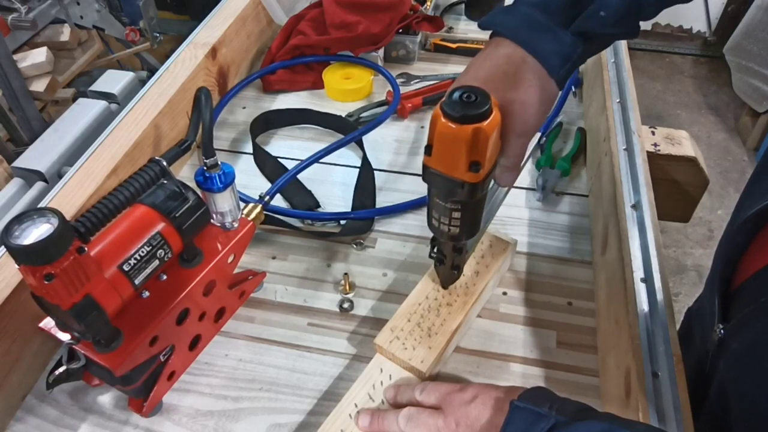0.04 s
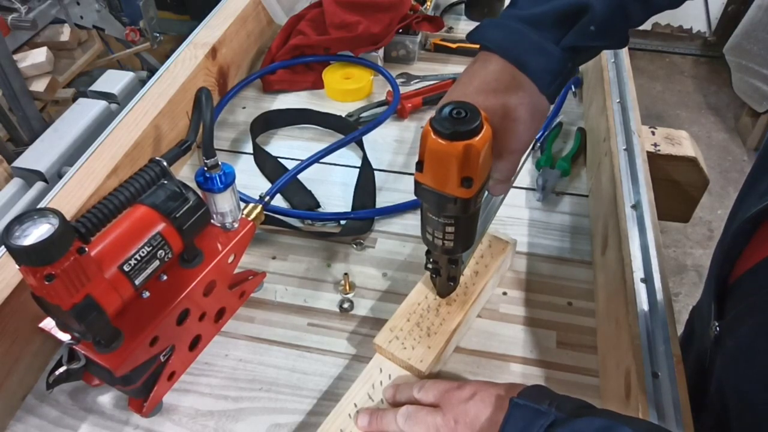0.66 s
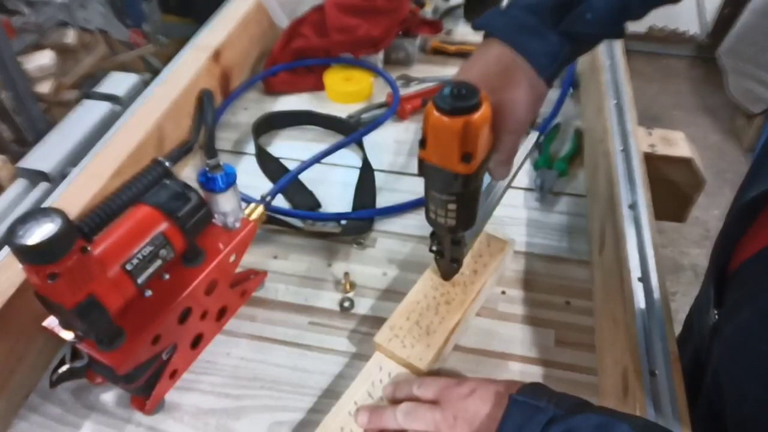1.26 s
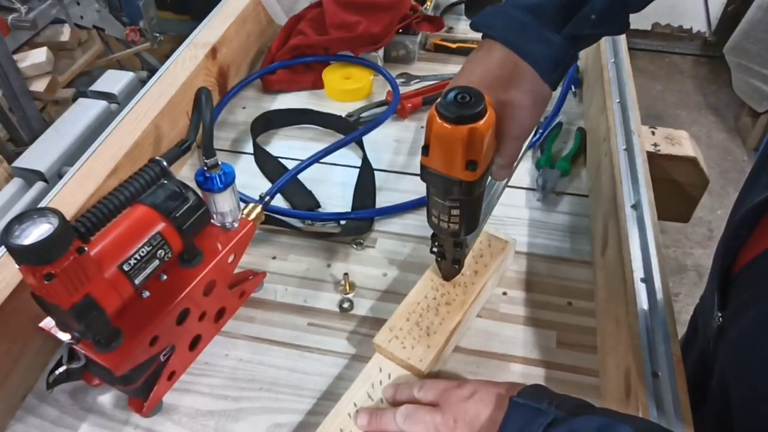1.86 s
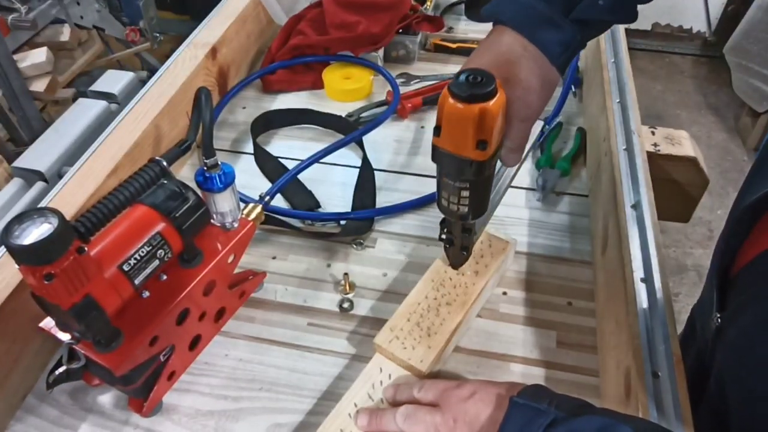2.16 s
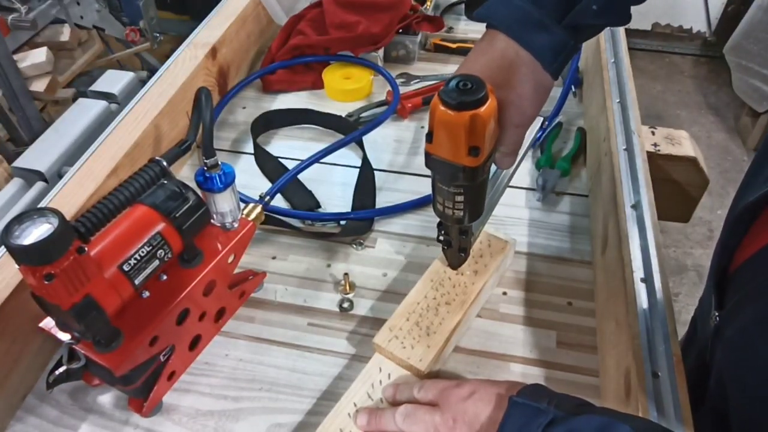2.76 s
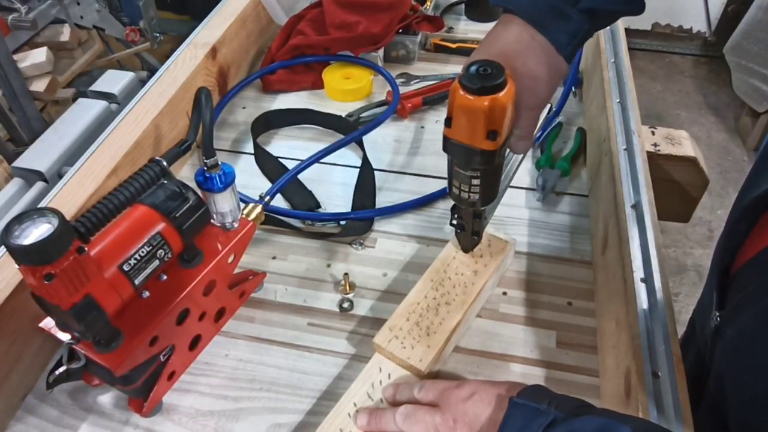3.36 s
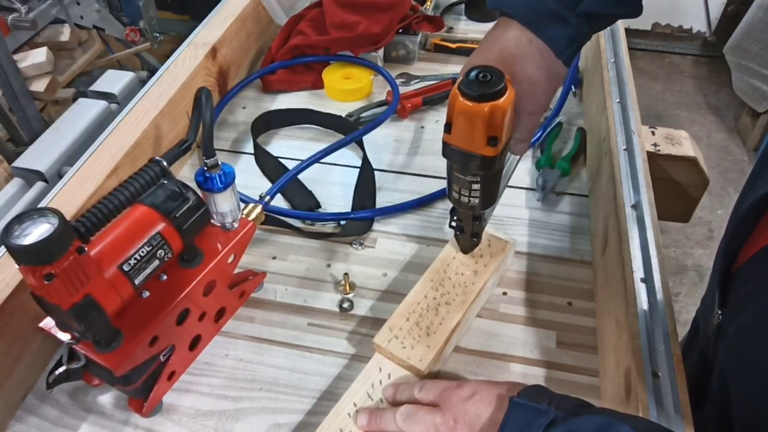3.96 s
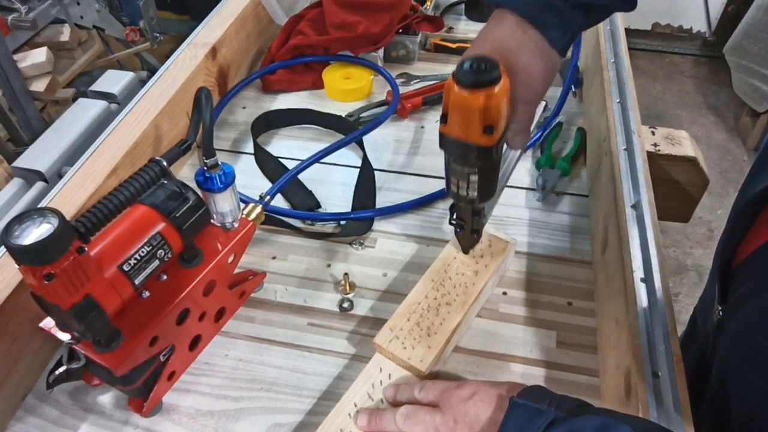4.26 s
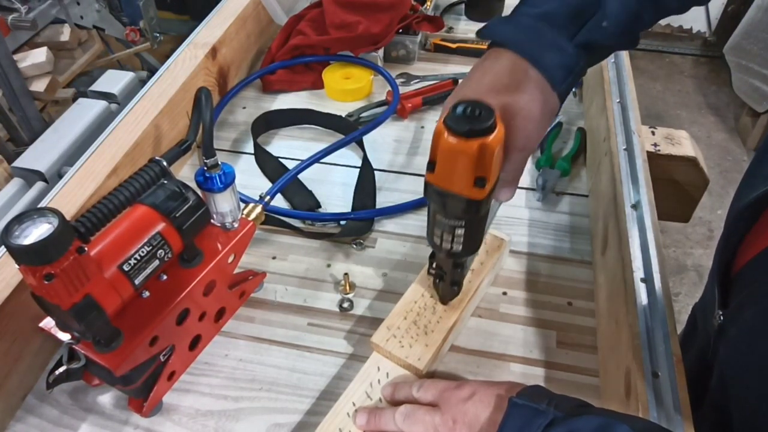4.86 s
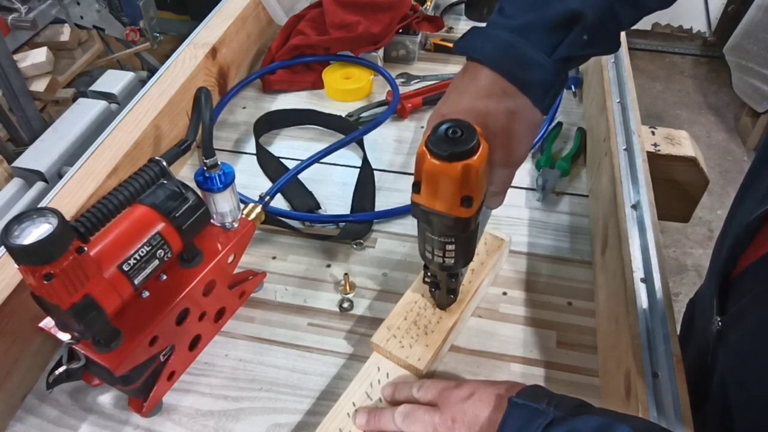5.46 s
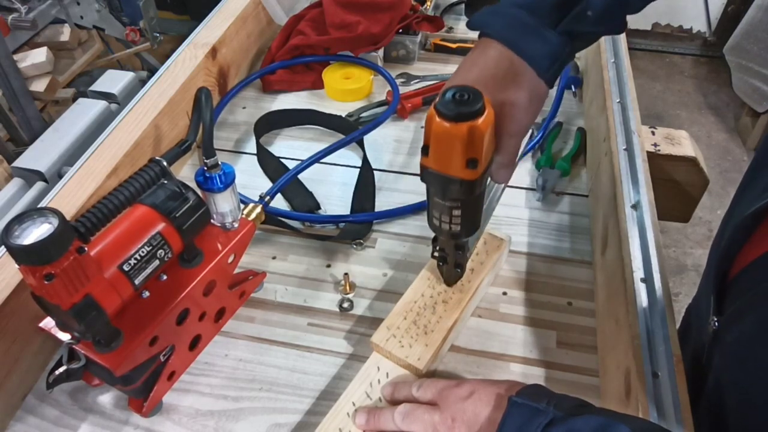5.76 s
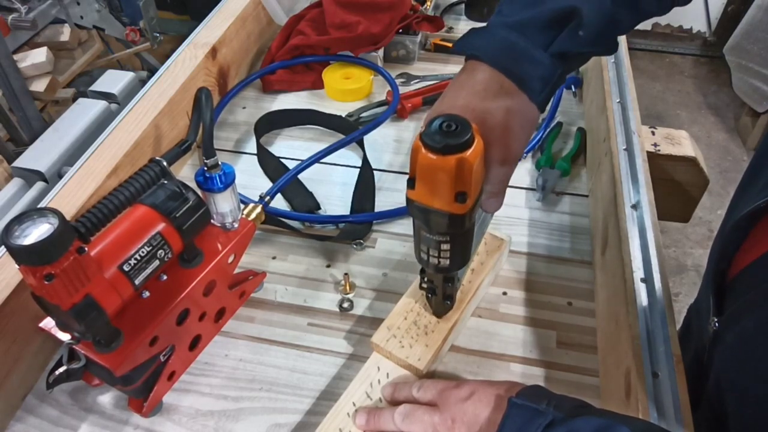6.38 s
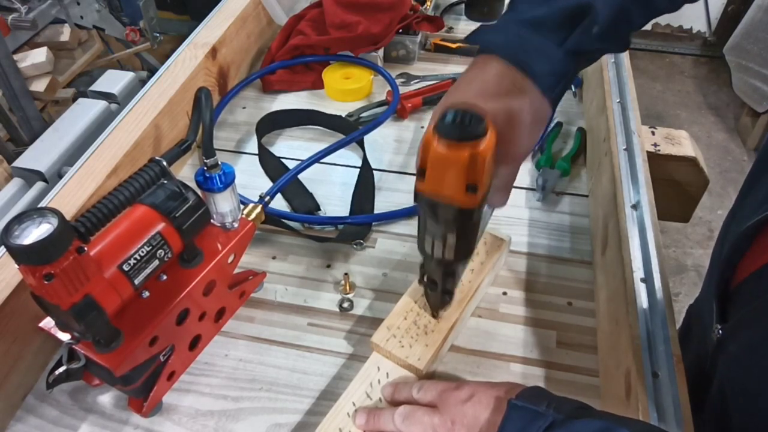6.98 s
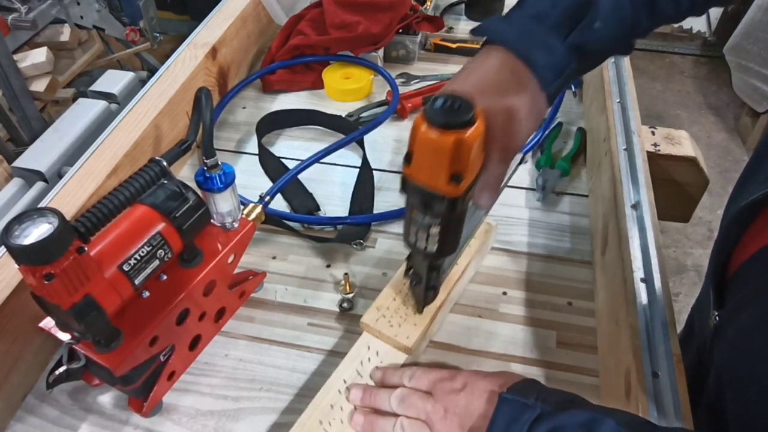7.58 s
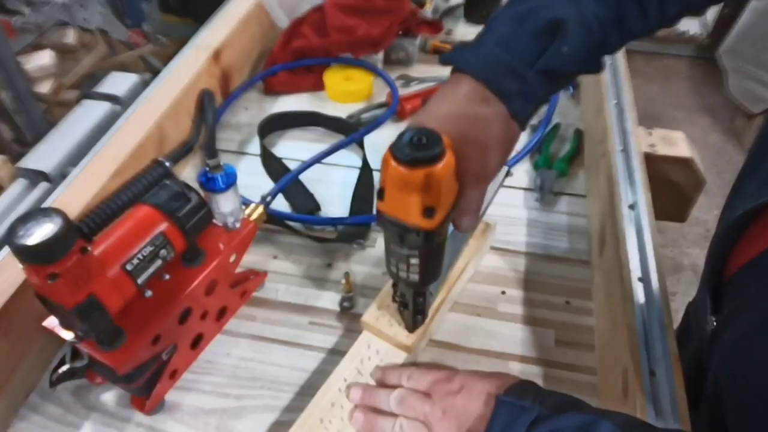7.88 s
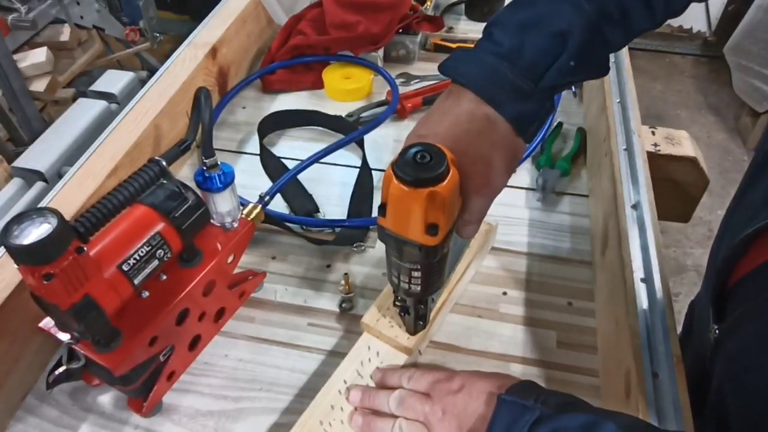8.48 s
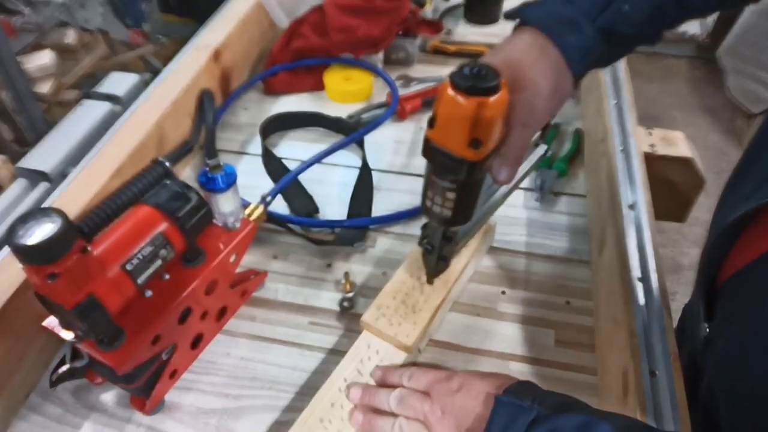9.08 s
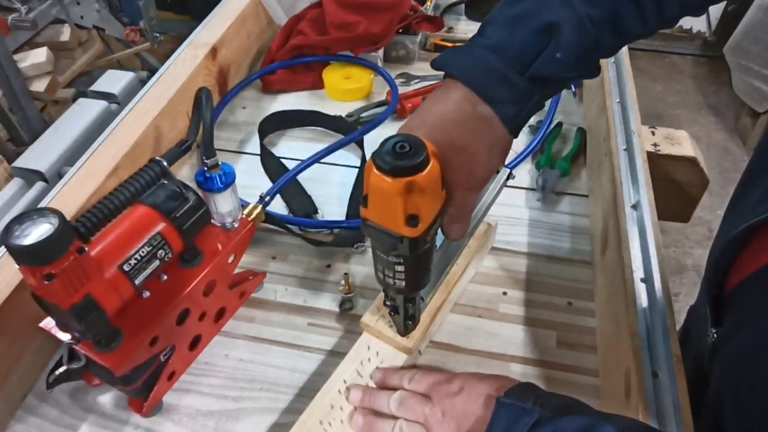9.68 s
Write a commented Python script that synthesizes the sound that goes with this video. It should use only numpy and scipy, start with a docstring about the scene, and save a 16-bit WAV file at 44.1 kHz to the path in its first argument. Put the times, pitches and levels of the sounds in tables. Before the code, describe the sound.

Heard close up in a quiet workshop, a pneumatic nail gun fires into wood seven times, a second or more apart, each shot a hard snap followed by an exhaust puff and a click. A small piston compressor, already running at the start, hums and clatters after each nail, then mostly slows and stops with faint metallic ticks. The volume dips for a moment under each shot.

```python
"""A small air compressor buzzes in a workshop, its piston knocking, then coasts to a ticking stop.
An air nailer then drives seven nails into a strip of wood on a workbench. In each shot air rushes in,
the driver hits the nail, the exhaust puffs and the piston bounces home. Each shot drops the pressure,
so the compressor runs until it is back, and ticks to a stop if no new shot comes first.
All of it is heard in mono through a close microphone that turns itself down under every shot."""
import sys
import numpy as np
from scipy import signal
from scipy.fft import rfft, irfft, next_fast_len
from scipy.io import wavfile
from scipy.ndimage import uniform_filter1d, map_coordinates

SR = 44100
rng = np.random.default_rng(int(sys.argv[2]) if len(sys.argv) > 2 else 0)


def transcribe(signal):
    """Save signal, clipped to [-1, 1], as a 16-bit WAV file at the path in sys.argv[1]."""
    frames = np.atleast_2d(signal).T
    limited = np.clip(frames, -1, 1)
    pcm = np.round(limited * 32767).astype(np.int16)
    wavfile.write(sys.argv[1], SR, pcm)


N = 429093

# The shots: strike_s, fill_s (air flows in this long before the strike),
# home_s (the piston is back this long after it), refill_s (time to restore the pressure)
SHOTS = [(.831, .022, .1465, .92), (1.9285, .0275, .169, .912), (2.8385, .0315, .1425, .976),
         (4.2105, .0265, .146, .949), (5.521, .028, .1505, .953), (6.915, .031, .123, .955),
         (8.515, .029, .125, .955)]
KNOCK_TURNS = 0.35  # how far into each turn of the pump's shaft its piston knocks


def amp(db):
    """Turn decibels into a gain."""
    return 10 ** (np.asarray(db) / 20)


def unit(x):
    """Scale a sound to an average (rms) level of 1."""
    return x / np.sqrt(np.mean(x ** 2) + 1e-20)


def along(points, hz):
    """Read between (pitch_hz, value) points, with octaves evenly spaced."""
    pitches, values = np.transpose(points)
    return np.interp(np.log(hz + 1), np.log(pitches + 1), values)


def filtered(x, response):
    """Give each frequency in x the gain response(hz)."""
    size = x.shape[-1]
    padded = next_fast_len(size + 8192)
    gains = response(np.fft.rfftfreq(padded, 1 / SR))
    return irfft(rfft(x, padded) * gains, padded)[..., :size]


def noise(spectrum, size=N):
    """Noise of average level 1, its tone shaped by (pitch_hz, level_db) points."""
    return unit(filtered(rng.standard_normal(size), lambda hz: amp(along(spectrum, hz))))


def wobble(rate_hz):
    """A smooth curve through rate_hz random values a second."""
    values = rng.standard_normal(int(N * rate_hz / SR) + 4)
    return map_coordinates(values, [np.arange(N) * rate_hz / SR])


def add(track, start_s, sound):
    """Mix a sound into a track at start_s."""
    part = track[max(round(start_s * SR), 0):][:len(sound)]
    part += sound[:len(part)]


def burst(spectrum, rise_s, hold_s, fade_s):
    """Noise that swells, holds, then falls by 60 dB in fade_s."""
    t = np.arange(SR // 3) / SR
    swell = 1 - np.exp(-t / rise_s)
    fade = amp(-60 * np.maximum(t - hold_s, 0) / fade_s)
    return noise(spectrum, size=len(t)) * swell * fade


def ring(tones, scatter_db):
    """A struck object: each tone starts at a slightly random level and falls by 60 dB in fade_s."""
    t = np.arange(SR // 3) / SR
    return sum(amp(db + scatter_db * rng.normal() - 60 * t / fade_s) * np.sin(2 * np.pi * hz * t)
               for hz, db, fade_s in tones)


def background():
    """The faint, steady noise of the workshop."""
    quiet = [(15, -68), (25, -31.5), (102, -3.5), (236, -5), (560, -9.5), (1480, -17.5), (5280, -33),
             (6380, -24.5), (9570, -47), (16000, -35)]  # room noise: pitch_hz, level_db
    return amp(-55.5) * noise(quiet)


def room(x):
    """The workshop's echo: each frequency dies away at its own speed."""
    echo_times = [(150, 0.36), (1000, 0.23), (7000, 0.27), (14000, .17)]  # how long the room rings: pitch_hz, fade_s
    hz, t, spectrum = signal.stft(rng.standard_normal(SR // 2), SR, nperseg=256)
    fade = amp(-60 * t / along(echo_times, hz)[:, None])
    tail = signal.istft(spectrum * fade, SR, nperseg=256)[1]
    echo = np.pad(tail, (SR // 200, 0)) / np.linalg.norm(tail)  # arrives 5 ms late
    return signal.fftconvolve(x, echo)[:len(x)]


def ticks():
    """Small, dry clicks of metal as the pump stops."""
    stalls = [(0.7518, -25), (4.0175, -29), (5.3535, -25.5), (6.6775, -30), (8.07, -27.5), (9.6655, -25)]  # the pump stalls: start_s, level_db
    tick_noise = [(500, -14.5), (2500, -20), (4500, 2.5), (5700, -10.5), (7500, 5), (9500, -10),
                  (16000, -15.5)]  # a metal click: pitch_hz, level_db
    out = np.zeros(N)
    for start_s, db in stalls:
        # the last stroke, the stall itself, the crank rocking back
        for delay_s, softer_db in [(-0.054, -5.5), (0, 0), (0.0635, -7.5)]:
            click = burst(tick_noise, rise_s=0.00089, hold_s=0.0021, fade_s=0.022)
            ping = amp(-7) * ring([(4620, 0, 0.044), (7550, -2, 0.04)], scatter_db=2.5)
            add(out, start_s + delay_s, amp(db + softer_db - 7.5) * (click + ping))
    return out + amp(-10) * room(out)


def refills(first_on_s=-0.59, first_off_s=0.578):
    """When the pressure drops and when it is back; the first refill is under way at the start."""
    after_shots = [(strike_s, strike_s + refill_s) for strike_s, _, _, refill_s in SHOTS]
    return [(first_on_s, first_off_s)] + after_shots


def motor_runs():
    """When the motor switches on and off: a shot starts it, or keeps it going if it still runs."""
    spans = []
    for drop_s, full_s in refills():
        still_running = spans and drop_s < spans[-1][1]
        on_s = spans.pop()[0] if still_running else drop_s
        spans.append((on_s, full_s))
    return spans


def pressure():
    """0 just after a shot, climbing steadily to 1 while the pump works."""
    t = np.arange(N) / SR
    level = np.zeros(N)
    for drop_s, full_s in refills():
        climb = np.clip((t - drop_s) / (full_s - drop_s), 0, 1)
        level = np.where(t >= drop_s, climb, level)
    return level


def shaft(stroke_hz=124.8, spin_up_s=0.048, coast_s=0.16, stall_s=0.235, fade_s=0.18):
    """Turns so far and force (0 to 1): the motor speeds up, then coasts until squeezed air stalls it."""
    t = np.arange(N) / SR
    top_hz = stroke_hz + 1.7 * np.exp(-t / 1.9)  # a little faster in the first seconds
    rate_hz, force = np.zeros(N), np.zeros(N)
    for on_s, off_s in motor_runs():
        speed = 1 - np.exp(-np.maximum(t - on_s, 0) / spin_up_s)
        speed *= np.exp(-np.maximum(t - off_s, 0) / coast_s)
        turning = np.clip((off_s + stall_s - t) / fade_s, 0, 1)
        rate_hz = np.maximum(rate_hz, top_hz * speed * (turning > 0))
        force = np.maximum(force, speed * turning)
    rate_hz *= 1 + 0.00069 * wobble(25)
    return np.cumsum(rate_hz) / SR, force


def strokes(turns, scatter_db):
    """One sharp tap per turn, timed more finely than one sample."""
    centres = np.interp(np.arange(1, int(turns[-1])), turns, np.arange(N))
    nearby = centres.astype(int)[:, None] + np.arange(-7, 9)
    offset = nearby - centres[:, None]
    shape = np.sinc(offset) * np.sinc(offset / 8)
    sizes = amp(scatter_db * rng.standard_normal((len(centres), 1)))
    return np.bincount(np.clip(nearby, 0, N - 1).ravel(), (shape * sizes).ravel(), N)


def pump_hum(turns, force, load_db=0.5):
    """Each stroke gulps air, making a hum that grows a little as the pressure climbs."""
    hum_tones = [(1, 1.5), (2, 5.5), (3, 1.5), (4, -27), (5, -12), (6, -25.5), (7, -19)]  # the hum's tones: multiple (of the stroke rate), level_db
    # higher tones fade sooner as the pump slows
    hum = sum(amp(db) * np.sin(2 * np.pi * multiple * turns) * force ** (2.44 + 0.26 * (multiple - 1))
              for multiple, db in hum_tones)
    return -unit(hum) * amp(-16.5 + load_db * pressure() + 0.2 * wobble(5.3))


def frame_shake(turns, force, slack, jitter=0.041):
    """Each turn jolts the pump's frame, unevenly while the crank is loose."""
    frame_tones = [(202, -8.5, 0.023), (303, -2, 0.068), (445, 0, 0.055), (534.4, -18.5, 0.44)]  # the ringing frame: pitch_hz, level_db, fade_s
    uneven_turns = np.maximum.accumulate(turns + jitter * slack * wobble(60))
    jolts = strokes(uneven_turns, scatter_db=0.2) * (slack ** 0.5 + 1.6 * force)
    return amp(-33) * signal.fftconvolve(jolts, ring(frame_tones, scatter_db=4.5))[:N]


def housing_ring(knocks, force):
    """The piston's knocks make the pump's case ring."""
    case_tones = [(1180, -15, 0.059), (1367, -7.5, 0.039), (1496, -8, 0.066), (1627, -7.5, 0.038),
                  (1774, -10, 0.04), (2243, -15, 0.066), (2852, -9, 0.068), (2903, -14, 0.12),
                  (3190, -13, 0.038), (3620, -12.5, 0.073), (3867, -14, .05), (4130, -13.5, 0.046),
                  (4370, -20, 0.057), (4637, -10.5, 0.12), (4756, -10.5, 0.058), (5490, -14, .05),
                  (6740, -4, 0.089), (6862, -1.5, 0.06), (7485, 0, 0.053), (7600, -3.5, .045),
                  (8200, -1, 0.014)]  # the ringing case: pitch_hz, level_db, fade_s
    return amp(-35.5) * signal.fftconvolve(knocks * force ** 1.02, ring(case_tones, scatter_db=1))[:N]


def clatter_and_air(knocks, turns, force):
    """Small parts clatter alike at every knock, and air hisses in time with the strokes."""
    bright_noise = [(500, -6), (1000, -15), (1600, -0.5), (2000, -10.5), (2500, -12), (4650, -7),
                    (4950, -16.5), (6100, -11.5), (6800, -1), (7500, -3), (7900, -7.5), (10000, -11),
                    (12000, -18.5), (16000, -22.5)]  # small parts and air: pitch_hz, level_db
    strength = force ** 1.3
    blend = 0.62 * wobble(1.465)  # the tone drifts between two clatters
    clatter = np.zeros(N)
    for share in (np.cos(blend), np.sin(blend)):
        clack = burst(bright_noise, rise_s=0.00023, hold_s=0, fade_s=0.068)
        clatter += signal.fftconvolve(knocks * strength * share, clack)[:N]
    pulsing = np.exp(0.092 * np.cos(2 * np.pi * (turns - KNOCK_TURNS - 0.12)))
    air = noise(bright_noise) * pulsing * strength
    return amp(-33.5) * unit(clatter) + amp(-37) * unit(air)


def crank_rattle(turns, slack):
    """The loose crank rattles, swelling once a turn."""
    rattle_noise = [(40, -37), (130, -15), (260, 4.5), (480, -2.5), (700, -11), (1000, -18.5),
                    (1400, -16.5), (3000, -26), (9000, -56.5)]  # a low rattle: pitch_hz, level_db
    return amp(-29) * noise(rattle_noise) * slack * np.exp(0.61 * np.cos(2 * np.pi * turns))


def pump_rumble(force):
    """A low rumble for as long as the pump turns."""
    # the rumble's tone: pitch_hz, level_db
    low_noise = [(25, -7), (80, -2.5), (250, 1.5), (450, -2.5), (900, -25.5), (3000, -39)]
    return amp(-43) * noise(low_noise) * force ** 0.24


def valve_song(turns, force, lead_s=0.11, width_s=0.12):
    """Squirts of air ring the valve's thin flap, loudest lead_s before the pressure is back."""
    flap_tones = [(8115, -8, 0.03), (8245, 3, 0.025), (8365, 4.5, 0.034), (8490, -20, 0.038),
                  (9340, 1, 0.034), (9370, -8, 0.047), (9200, -2, .05)]  # the ringing flap: pitch_hz, level_db, fade_s
    t = np.arange(N) / SR
    swell = force * sum(np.exp(-((t - full_s + lead_s) / width_s) ** 2) for _, full_s in refills())
    squirts = strokes(turns - KNOCK_TURNS, scatter_db=2.5)
    ringing = signal.fftconvolve(squirts, ring(flap_tones, scatter_db=0.5))[:N]
    return amp(-31.5) * swell * unit(ringing)


def compressor(bass_cut_hz=95):
    """A piston pump: each stroke gulps air, knocks the case and squirts through the valve."""
    turns, force = shaft()
    slack = 6 * force ** 1.49 * np.clip(1 - force, 0, 1)  # the crank is loose only below full speed
    hum = pump_hum(turns, force)
    knocks = strokes(turns - KNOCK_TURNS, scatter_db=0.2)
    frame = frame_shake(turns, force, slack)
    # so small a body gives off little bass
    body = filtered(hum + frame, lambda hz: hz ** 6 / (hz ** 6 + bass_cut_hz ** 6))
    return (body + housing_ring(knocks, force) + clatter_and_air(knocks, turns, force)
            + crank_rattle(turns, slack) + pump_rumble(force) + valve_song(turns, force))


def nailer(trigger_lead_s=0.017, vent_lead_s=0.0427, bounce_lead_s=0.0097):
    """Air fills the cylinder, the driver sinks the nail, the exhaust puffs, the piston bounces home."""
    air_in = [(100, -12), (600, -14), (1800, -15), (3200, -6.5), (5200, -10.5), (7500, 1.5), (9000, -11.5),
              (13000, -10), (16000, -7.5)]  # air rushing through a valve: pitch_hz, level_db
    air_out = [(30, -29.5), (110, 5), (300, -1), (900, -4), (3000, -8), (5200, -12.5), (7300, 3.5),
               (9000, -12), (13000, -8), (16000, -9.5)]  # the exhaust puff: pitch_hz, level_db
    blow = [(25, -23.5), (90, -9.5), (330, 0.5), (620, -22), (850, 2), (1200, 0.5), (1600, -6.5),
            (2500, -6), (3400, -21), (4500, -15), (8000, -24), (16000, -35)]  # the blow on the wood: pitch_hz, level_db
    piston = [(30, -32), (100, -12.5), (650, -2.5), (900, 0.5), (1400, -3.5), (1800, -1), (2200, -14),
              (2600, -9), (4500, -13), (8000, -27), (16000, -29)]  # the crack of piston and driver: pitch_hz, level_db
    nail = [(300, -22), (1200, -8), (2500, -5), (4600, 5), (5500, -7.5), (7300, 7.5), (9000, -7),
            (16000, -9)]  # the nail going in: pitch_hz, level_db
    bench = [(85, -15, 0.14), (163, 1.5, 0.1), (299.6, 1, 0.23), (442, 0.5, 0.1), (681, -4, .1),
             (864, 7.5, 0.074), (876, -4, 0.14), (1000, -8, 0.13), (1109, 7.5, 0.089), (1390, -9.5, 0.057),
             (1640, -14.5, 0.076), (2460, -2.5, 0.14)]  # the ringing wood strip and bench top: pitch_hz, level_db, fade_s
    recoil = [(.021, -10), (.033, -13.5)]  # the tool's nose chatters on the wood: delay_s, level_db
    out = np.zeros(N)
    for strike_s, fill_s, home_s, _ in SHOTS:
        open_s = strike_s - fill_s  # the main valve opens
        trigger_leak = amp(-35.5) * burst(air_in, rise_s=0.002, hold_s=0.005, fade_s=0.051)
        add(out, open_s - trigger_lead_s, trigger_leak)
        shot = np.zeros(SR * 3 // 4)  # times in here count from open_s
        hit_s, seat_s = fill_s, fill_s + home_s
        vent_s, bump_s = seat_s - vent_lead_s, seat_s - bounce_lead_s
        # air rushes in and the piston gathers speed
        add(shot, 0, amp(-11.5) * burst(air_in, rise_s=0.0033, hold_s=0.019, fade_s=0.21))
        add(shot, hit_s * 0.26, amp(-24.5) * burst(blow, rise_s=0.012, hold_s=0.01, fade_s=0.04))
        # the driver cracks onto the nail, and the bench thuds and rings
        add(shot, hit_s, amp(2.5) * burst(blow, rise_s=0.0011, hold_s=0.0039, fade_s=0.049))
        add(shot, hit_s + 0.0005, amp(3.5) * burst(piston, rise_s=0.00026, hold_s=0.00083, fade_s=0.011))
        add(shot, hit_s, amp(-6) * ring([(131, 0.44, 0.04), (266, -2, 0.014)], scatter_db=2))
        add(shot, hit_s, amp(-12) * ring(bench, scatter_db=3))
        add(shot, hit_s + 0.0055, amp(1) * burst(nail, rise_s=0.00091, hold_s=0.0032, fade_s=0.05))
        for delay_s, db in recoil:
            add(shot, hit_s + delay_s, amp(db) * burst(blow, rise_s=0.0005, hold_s=0.0023, fade_s=0.027))
        # the exhaust opens and puffs
        add(shot, vent_s, amp(-7.5) * burst(air_in, rise_s=0.0013, hold_s=0.013, fade_s=0.077))
        add(shot, vent_s + 0.011, amp(-1) * burst(air_out, rise_s=0.0013, hold_s=0.011, fade_s=0.098))
        # the piston bumps once, then lands home
        add(shot, bump_s, amp(-0.5) * burst(piston, rise_s=0.0003, hold_s=0.00042, fade_s=0.031))
        add(shot, seat_s, amp(5) * burst(piston, rise_s=0.00015, hold_s=0.0011, fade_s=0.012))
        add(out, open_s, shot + amp(-11.5) * room(shot))
    return out


def scene():
    """All the sources together, the same in both channels."""
    mono = compressor() + nailer() + ticks() + background()
    return np.array([mono, mono])


def gain_control(x, threshold_db=-23, slope=0.62, release_s=0.069, edge_hz=700):
    """Loud, bright sound pulls the volume down at once; it creeps back afterwards."""
    bright = filtered(x[0], lambda hz: hz ** 4 / (hz ** 4 + edge_hz ** 4))
    level_db = 10 * np.log10(np.abs(uniform_filter1d(bright ** 2, size=220)) + 1e-12)
    cut_db = slope * np.maximum(level_db - threshold_db, 1e-6)
    leak = np.arange(N) / SR / release_s
    held_db = np.exp(np.maximum.accumulate(np.log(cut_db) + leak) - leak)  # each cut dies away smoothly
    return x * amp(-uniform_filter1d(held_db, size=130))


def record(dry):
    """The microphone ducks loud sounds, thins the bass, dips the treble and rounds off the peaks."""
    microphone = [(25, -8), (55, -1), (100, 0), (8300, 0), (8750, -5.5), (9400, -7.5), (11400, -16.5),
                  (11700, 2.5)]  # the microphone's tone: pitch_hz, gain_db
    peak_limit, top_hz = 0.75, 15800
    x = filtered(gain_control(dry), lambda hz: amp(along(microphone, hz)))
    x = x / (1 + np.abs(x / peak_limit) ** 8) ** (1 / 8)
    return filtered(x, lambda hz: 1 / (1 + (hz / top_hz) ** 200))  # a steep cut above top_hz


dry = scene()
out = record(dry)
transcribe(out)
```